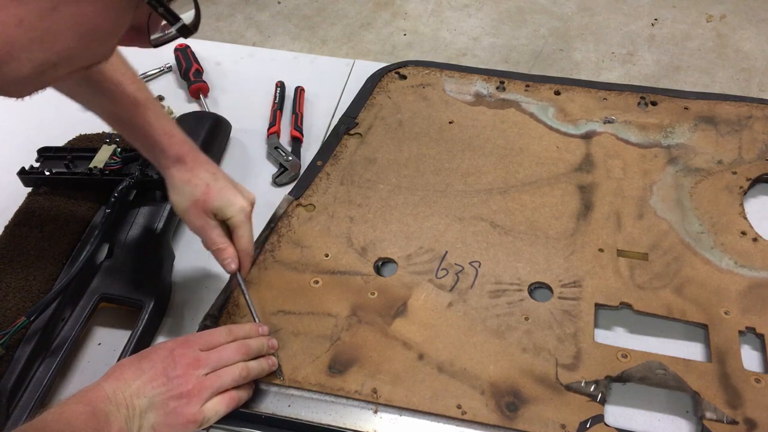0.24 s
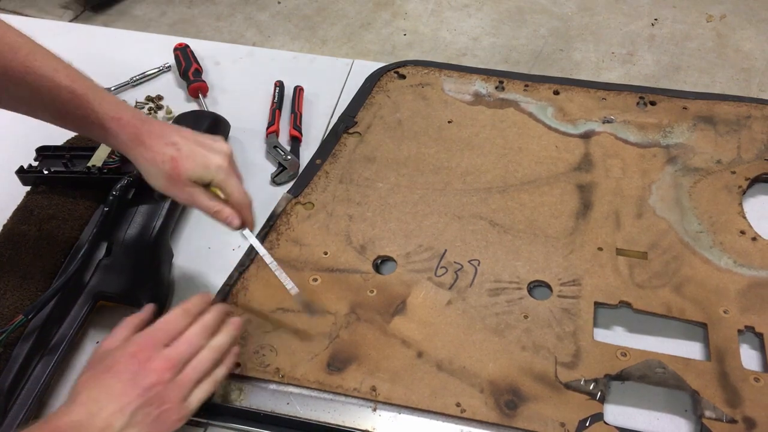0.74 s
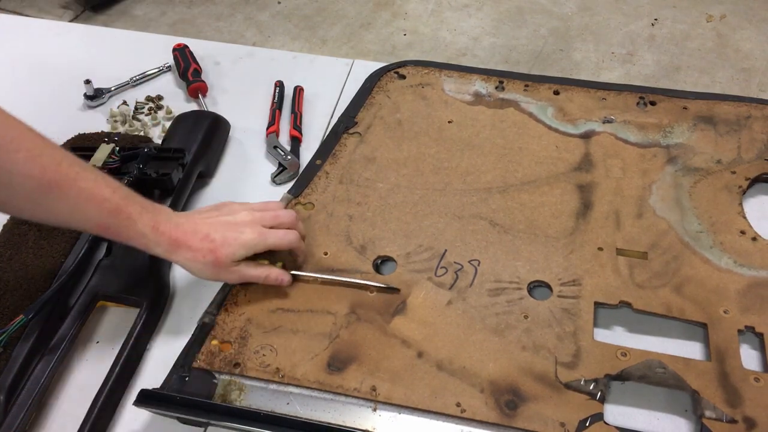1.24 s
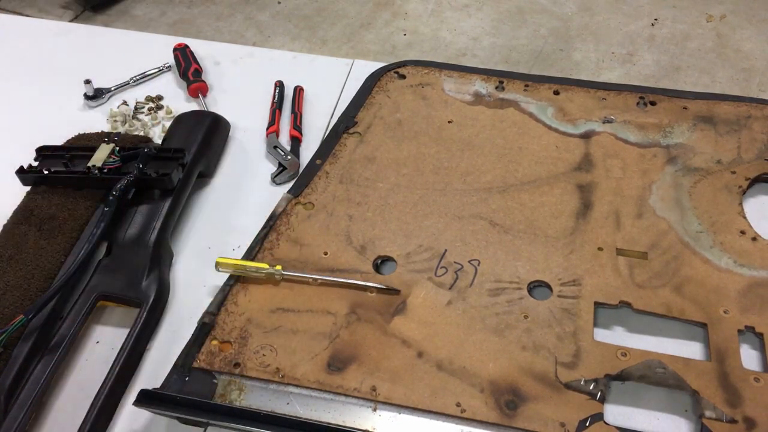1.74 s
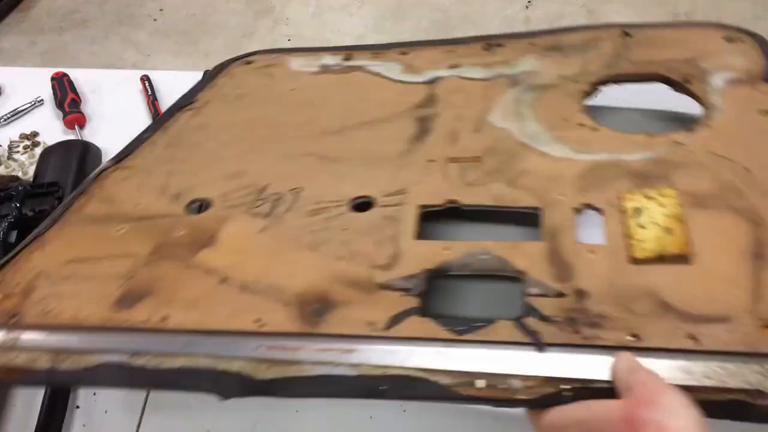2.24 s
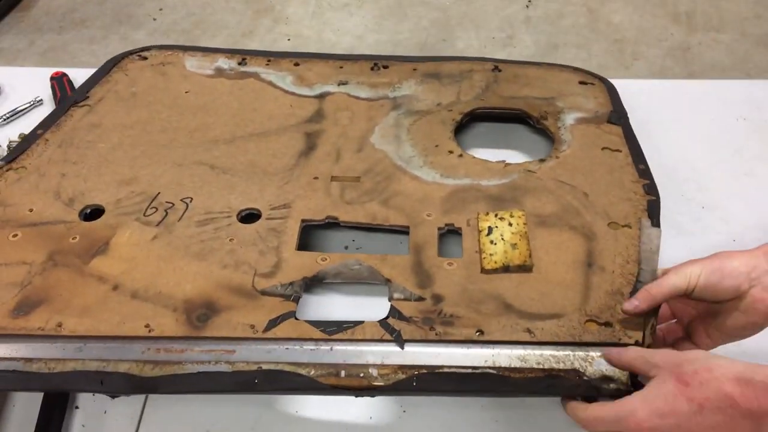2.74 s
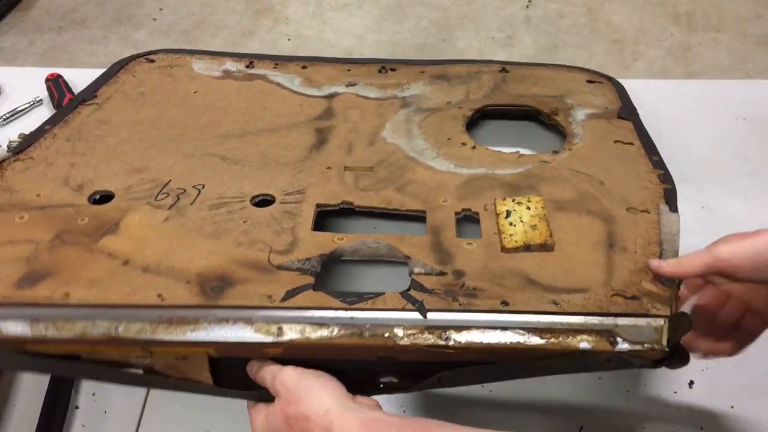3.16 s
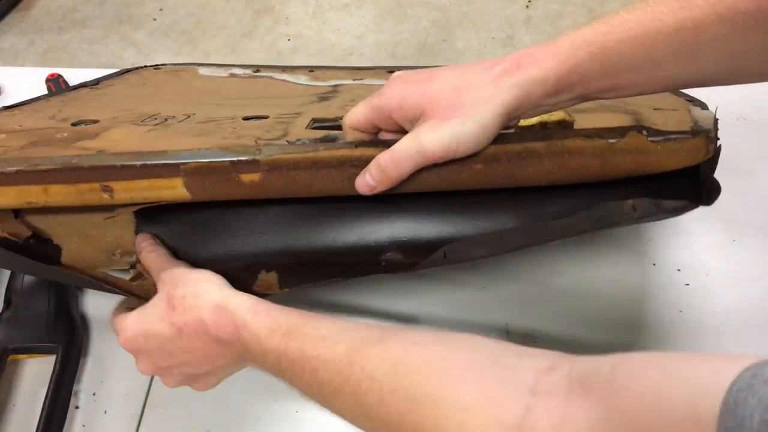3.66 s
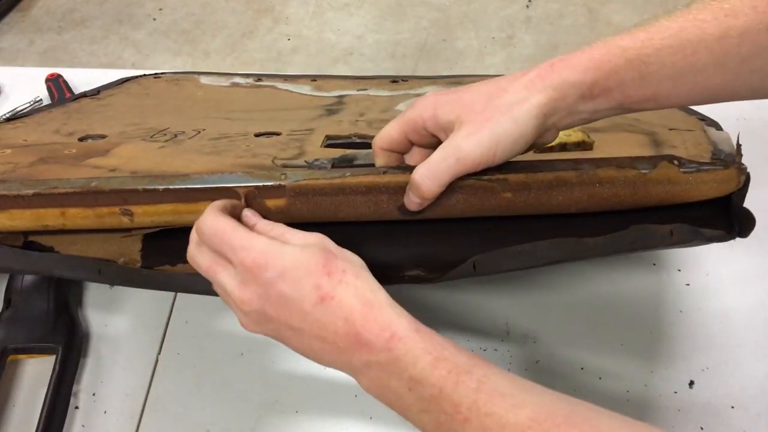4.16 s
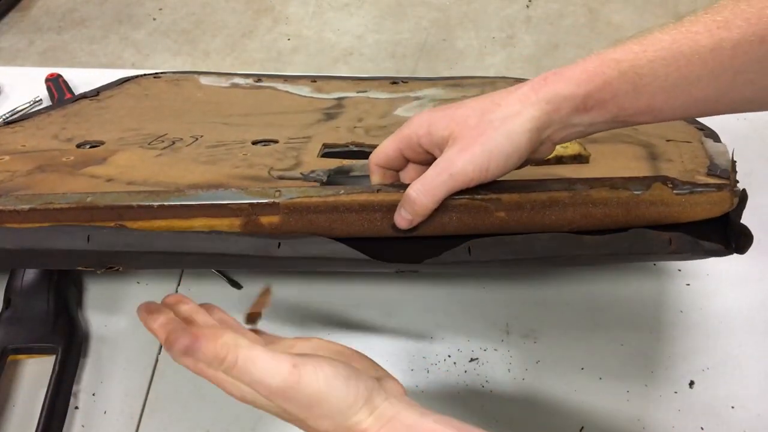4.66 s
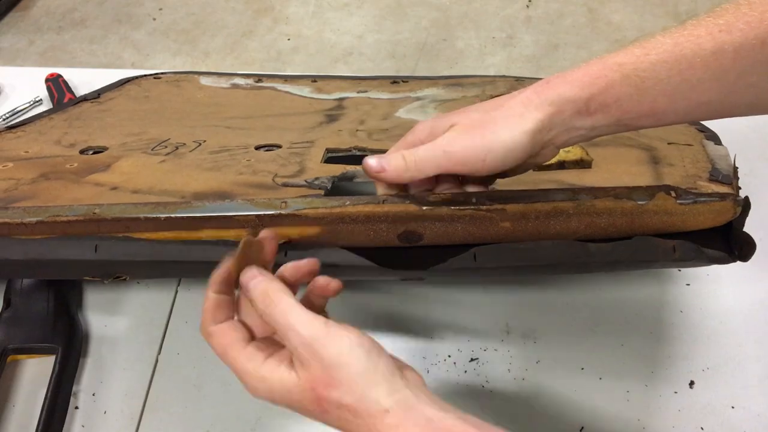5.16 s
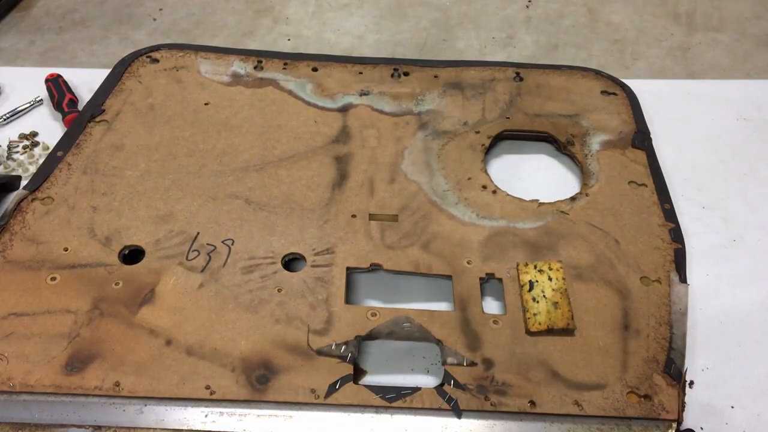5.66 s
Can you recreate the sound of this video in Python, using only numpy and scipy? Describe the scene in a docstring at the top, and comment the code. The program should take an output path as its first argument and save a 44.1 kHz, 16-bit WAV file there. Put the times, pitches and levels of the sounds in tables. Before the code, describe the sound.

A screwdriver levers and clacks against a resonant board, followed by scuffs, thuds, and short tearing pulls in a quietly rumbling workshop.

```python
"""Steel knocks ring a hardboard panel on a workshop bench: a screwdriver levers out a staple and is laid down.
Then the panel is turned and its glued covering peeled off in pulls, with crackle, rips, flaps and bumps.
Knocks are dispersed bending waves over decaying modes; bumps are short damped vibrations under scuffing noise.
Peeling and rubbing shape random fibre snaps by force curves; rips and crumbs are brief bursts of such snaps.
One near microphone, almost mono, hears it over a steady rumble and hiss."""
import sys
import numpy as np
from scipy import signal
from scipy.fft import rfft, irfft, next_fast_len
from scipy.io import wavfile
from scipy.ndimage import uniform_filter1d, map_coordinates

SR = 44100
rng = np.random.default_rng(int(sys.argv[2]) if len(sys.argv) > 2 else 0)


def to_wav(s):
    """Save 16-bit WAV."""
    ch = np.atleast_2d(s).T  # columns
    pcm = np.round(np.clip(ch, -1, 1) * 32767)  # PCM
    wavfile.write(sys.argv[1], SR, pcm.astype(np.int16))


N = 259749  # samples

# Event levels in dB are relative: each source adds its own offset.
# Steel meets the board. Each row: start in seconds, blow in dB, contact cut-off in Hz,
# steel click in dB, board ringing in dB.
KNOCKS = [(0.2562, -21, 1360, -29, -14), (0.3439, -7.5, 1760, -18, -8.5), (0.351, -3.5, 2200, -5.5, 4.5),
          (0.6929, -29, 1200, -33, -15.5), (0.871, -32, 2210, -53, -40), (1.057, 0, 1460, -36, -1.5),
          (1.162, -13, 2780, -27, -10.5), (1.2556, -1, 1480, -47, 4), (1.2958, -2.5, 1800, -53, -0.5),
          (1.598, -25.5, 1790, -34.5, -18.5), (1.685, -22.5, 1060, -34, -21),
          (1.903, -29.5, 2320, -60, -33)]
# Modes that ring after a knock, before a small random spread: the panel on the bench,
# and probably the screwdriver near 473 Hz. Each row: frequency in Hz, level in dB, t60 in seconds.
KNOCK_MODES = [(66, -10.5, 1), (96, -2, 0.26), (144.4, 1, 0.53), (178, -4.5, 0.46), (239.4, -16, 0.59),
               (285.4, -3.5, 0.32), (344, -16, 0.67), (473, -.5, 0.19), (600, -16, 0.14), (730, -5.5, 0.19),
               (910, -8, 0.09), (1182, -1.5, 0.11), (1810, -11, .09)]
# Spectrum of the first flexing wave. Each row: frequency in Hz, level in dB.
PUSH_SPECTRUM = [(40, -21), (130, -3), (450, 2.5), (950, -5), (1300, -7), (1900, -5.5), (3000, -8.5),
                 (16000, -6)]
# Returns from the panel's edges. Each row: delay in seconds, share of the amplitude.
EDGE_RETURNS = [(.00115, .25), (.0022, .3), (.0045, .25)]
# Spectrum of the steel click. Each row: frequency in Hz, level in dB.
STEEL_SPECTRUM = [(300, -13), (1200, 11.5), (2200, 8.5), (4000, -1), (5500, -6), (8000, 2.5), (10500, -8),
                  (15000, -5)]

# One pull on the covering. Each row: start in seconds, length in seconds, crackle in dB,
# fizz over crackle in dB, change of force by the end in dB.
PULLS = [(2.911, 0.13, -35.5, -4.5, -5), (3.023, 0.082, -34.5, -2, -6), (3.143, 0.091, -34, -8.5, -12),
         (3.314, 0.072, -39.5, -6, 0.5), (3.374, 0.056, -35.5, 0, -2.5), (3.438, 0.068, -42, -10, -1),
         (3.525, 0.12, -34.5, -2, -3), (3.727, 0.062, -42, -3.5, 0), (3.787, 0.067, -32.5, -4.5, -7),
         (3.894, 0.16, -35, -3, -7), (4.063, 0.248, -49.5, -2, -2), (4.785, 0.14, -50, -4, 0),
         (4.937, 0.17, -46, -0.5, -10.5), (5.151, 0.034, -54, 4, 10), (5.341, 0.094, -48, -6, 14.5)]
# A brief rip or crunch: the staple drags out, or a patch of glue gives. Each row: centre in seconds,
# level in dB, treble in dB, half length in seconds, resonance in Hz.
RIPS = [(0.351, -16.5, 2, 0.0011, 766), (0.621, -35, -2, 0.0029, 1090), (1.838, -43, 2, .003, 765),
        (2.137, -35.5, -15, 0.011, 3130), (2.318, -43.5, -3, 0.013, 3760), (2.578, -44.5, 2, 0.0036, 3540),
        (2.759, -43.5, 4.5, 0.0055, 2400), (2.891, -36.5, -5, 0.0065, 1900), (2.918, -36, 0, 0.0058, 4000),
        (3.166, -43, 11, 0.003, 1370), (3.21, -38.5, -8, 0.0032, 1470), (3.261, -34.5, 1, 0.0056, 3040),
        (3.36, -33.5, -5, 0.0093, 1270), (3.447, -32, -17, .004, 2500), (3.697, -28.5, -9.5, 0.013, 1370),
        (3.846, -29.5, -12, 0.011, 1160), (3.978, -31.5, -21, 0.0028, 4170),
        (4.179, -41, 4.5, 0.0092, 3420), (4.25, -41.5, 6.5, 0.01, 2500), (4.28, -36, 1, 0.0068, 3530),
        (4.917, -39.5, 5, 0.0039, 2970), (5.062, -44.5, -10, 0.0051, 1440), (5.441, -31, -0.5, .013, 1500)]
# Loose crumbs of glue are picked off. Each row: centre in seconds, level in dB.
CRUMBS = [(.075, -57), (4.408, -51.5), (4.44, -57), (4.485, -54.5), (4.552, -51.5), (4.585, -53),
          (4.603, -51.5)]
# Body of the snapping fibres. Each row: frequency in Hz, level in dB.
CRACKLE_SPECTRUM = [(260, -2.5), (450, -12), (768, -4), (823, -5.5), (955, -3), (1120, -0.5), (1300, -2.5),
                    (1950, -1), (2930, -6), (4300, -11.5), (4800, -20.5), (6240, -28), (10600, -120)]
# Treble of the snapping fibres. Each row: frequency in Hz, level in dB.
FIZZ_SPECTRUM = [(2590, -22.5), (4400, -5.5), (4930, -10), (5550, -2.5), (7760, -5.5), (9030, -3.5),
                 (10500, -9), (11300, -6), (15100, -11.5), (16000, -23)]
# How far the colour of the snaps wanders. Each row: frequency in Hz, rms deviation in dB.
GRAIN_PATCHES = [(2000, 3.5), (9000, 2)]

# The board bumps and flaps, or the bench booms low. Each row: peak time in seconds, level in dB,
# lowest mode in Hz, rise in seconds, overtone slope in dB per octave, scuff in dB.
BUMPS = [(.09, -39.5, 150, 0.0051, -8, -48), (0.388, -28, 64.8, 0.0041, 3, -52),
         (.705, -38, 147, .0033, -9, -52), (2.069, -37, 84, .0031, -25, -38),
         (2.179, -37, 393, 0.015, -2, -29.5), (2.244, -33, 101, 0.004, -6, -36),
         (2.324, -29, 104, 0.0023, -7, -32.5), (2.365, -29.5, 97, 0.004, -6, -41),
         (2.404, -18, 162, 0.003, 5.5, -20), (2.491, -33, 128, 0.0024, -4, -55),
         (2.675, -25.5, 80.3, .0075, 2.5, -26), (2.717, -29, 704, .002, -18, -36),
         (3.234, -31, 360, 0.0026, -4, -43), (3.3, -33, 504, 0.0052, 2, -20.5),
         (3.469, -34, 330, 0.0027, -15, -41), (3.664, -11, 1423, 0.0018, -29, -49),
         (3.666, -11, 268.5, 0.0026, -1, -11.5), (3.689, -20, 243, 0.0068, -17, -18.5),
         (3.847, -55, 536, 0.0017, 8, -24.5), (3.939, -24.5, 309, 0.0036, -24, -48),
         (5.289, -43.5, 134, 0.013, -1.5, -49.5), (5.447, -22.5, 386, 0.0085, -6.5, -19),
         (5.454, -16, 142.3, 0.0083, -2, -27.5), (5.63, -50, 164, .004, -5, -43),
         (5.706, -38, 88.4, .0056, 0.5, -50.5)]
# Modes of a damped vibration. Each row: ratio to the lowest mode, level in dB.
FLEX_MODES = [(1, 3.5), (2.12, -1), (3.1, -10), (5.1, -58), (7.3, -21.5)]
# Spectrum of the scuff under a bump. Each row: frequency in Hz, level in dB.
SCUFF_SPECTRUM = [(40, -22), (120, 5), (500, -1.5), (900, -2.5), (1400, -7.5), (2000, -9.5), (3000, -18),
                  (5000, -26.5), (16000, -47)]

# Hands, tool and panel slide over each other. Each row: start in seconds, length in seconds,
# level in dB, change of pressure by the end in dB.
RUBS = [(0.522, 0.12, -52, 3.5), (1.161, 0.089, -51, 4.5), (1.707, 0.17, -46, -7),
        (1.929, 0.014, -42.5, 1.5), (2.094, 0.12, -37.5, -3.5), (2.231, 0.035, -40.5, -2.5),
        (2.428, 0.23, -49, -4.5), (2.671, .03, -41, -6), (2.73, 0.187, -48.5, 3.5),
        (5.476, .085, -50.5, 0.5), (5.618, 0.051, -51.5, -2), (5.751, 0.092, -44, -16.5)]
# Spectrum of the shaking board. Each row: frequency in Hz, level in dB.
RUSTLE_SPECTRUM = [(26, -32), (45, -2.5), (87, 2), (189, -3.5), (313, 2.5), (372, -2), (432, -8), (519, -6),
                   (596, -6), (700, -7.5), (910, -35), (1540, -120)]

# Reverberation of the workshop. Each row: frequency in Hz, t60 in seconds.
ROOM_DECAY = [(60, 1), (200, 0.59), (1000, 0.49), (3000, 0.38), (8000, 0.33), (16000, 0.29)]
# Spectrum of the background. Each row: frequency in Hz, level in dB.
AIR_SPECTRUM = [(12, -58), (20, -14), (68, -2.5), (101, 3), (123, -5.5), (187, -8.5), (270, -9), (310, -11),
                (873, -17.5), (2080, -20), (3250, -23.5), (4420, -20), (4940, -24.5), (9140, -27.5),
                (16000, -31)]
# Right channel over left. Each row: frequency in Hz, difference in dB.
TILT = [(100, 0.36), (500, 0.37), (2000, 0.05), (12000, 0.03)]

# a bump rings this long at this pitch; higher ones die sooner
DAMPED_T60_S, DAMPED_HZ, DAMPED_SLOPE = 0.084, 160, 0.87
# the force of a pull rises and falls fast; it also shakes the board (rustle relative to crackle)
PULL_ATTACK_S, PULL_RELEASE_S, PULL_RUSTLE_DB = 0.013, 0.015, -4.5
# a rub is softer and duller than a pull (fizz and rustle relative to crackle)
RUB_ATTACK_S, RUB_RELEASE_S, RUB_FIZZ_DB, RUB_RUSTLE_DB = 0.017, 0.025, -7.5, 1.5
CRUMB_S, CRUMB_CRACKLE_DB = 0.0051, -9  # half length; body relative to the fizz
TOP_HZ = 15950  # band limit


def amp(db):
    """A level in decibels is twenty times the logarithm of an amplitude ratio."""
    return 10 ** (np.asarray(db) / 20)


def unit(x):
    """Normalisation: the mean square measures power, so dividing by its root gives rms 1."""
    return x / np.sqrt(np.mean(x ** 2) + 1e-20)


def along(points, hz):
    """Interpolation on a logarithmic frequency axis, from rows of (Hz, value)."""
    point_hz, values = np.transpose(points)
    return np.interp(np.log(hz + 1), np.log(point_hz + 1), values)


def filtered(x, response):
    """Linear filtering: the spectrum is multiplied by a response of frequency."""
    n = x.shape[-1]
    padded = next_fast_len(n + SR // 8)
    spectrum = rfft(x, padded) * response(np.fft.rfftfreq(padded, 1 / SR))
    return irfft(spectrum, padded)[..., :n]


def coloured(x, spectrum):
    """Spectral shaping: a signal is weighted by a level curve and brought to rms 1."""
    return unit(filtered(x, lambda hz: amp(along(spectrum, hz))))


def wobble(rate):
    """Random modulation: straight lines join normally distributed knots, rate of them a second."""
    knots = rng.standard_normal(int(N * rate / SR) + 4)
    return map_coordinates(knots, [np.arange(N) * rate / SR], order=1)


def add(track, s, sound):
    """Superposition: a sound is summed into the track from s seconds on."""
    i = max(round(s * SR), 0)
    track[i:i + len(sound)] += sound[:max(N - i, 0)]


def flex_wave(spectrum, contact_hz, spread_s, size):
    """Dispersion: a blow spreads as a bending wave whose highs arrive first."""
    hz = np.fft.rfftfreq(size, 1 / SR)
    gain = amp(along(spectrum, hz)) / np.sqrt(1 + (hz / contact_hz) ** 6)
    delay = spread_s / np.sqrt(hz / 1000 + .1)
    # phase is the running sum of group delay over frequency
    phase = -2 * np.pi * np.cumsum(delay) * SR / size
    return irfft(gain * np.exp(1j * phase), size)


def screwdriver(push_db=22, ring_db=-27, click_db=9, wet_db=-9, click_wet_db=-3, take_up_s=0.0087):
    """Impact excitation: each contact clicks, flexes the board and leaves modes ringing."""
    out, t = np.zeros(N), np.arange(SR) / SR
    for s, db, contact_hz, steel_db, board_db in KNOCKS:
        push = amp(db + push_db) * flex_wave(PUSH_SPECTRUM, contact_hz, spread_s=0.00153, size=SR)
        # the wave comes back from the panel's edges and colours the knock
        push = push + sum(share * np.roll(push, round(lag * SR)) for lag, share in EDGE_RETURNS)

        ring = np.zeros(SR)
        for hz, level, t60 in KNOCK_MODES:
            decay = amp(level + rng.normal(0, 0.19) - 60 * t / t60)
            detuned_hz = hz * (1 + rng.normal(0, 0.0262))
            ring += decay * np.sin(2 * np.pi * detuned_hz * t)
        # the bench takes up the blow over a few milliseconds
        ring *= amp(board_db + ring_db) * (1 - np.exp(-t / take_up_s))

        click = amp(steel_db + click_db) * flex_wave(STEEL_SPECTRUM, SR, spread_s=0.0029, size=SR)
        wet = amp(wet_db) * room(push) + amp(click_wet_db) * room(click)
        add(out, s, push + ring + click + wet)
    return out


def fibres(rate=3000, scatter_db=4, hiss=0.81):
    """Random fracture: tiny bonds break at random moments and uneven sizes, in shifting colour."""
    breaks = (rng.random(N) < rate / SR) * amp(scatter_db * rng.standard_normal(N))
    snaps = unit(breaks * rng.choice([-1, 1], N))
    hz, _, z = signal.stft(snaps + hiss * rng.standard_normal(N), SR, nperseg=256)
    # noise smoothed over frequency, then time, makes slowly moving patches
    field = uniform_filter1d(rng.standard_normal(z.shape), size=4, axis=0)
    field = uniform_filter1d(field, size=7, axis=1)
    patchy_db = along(GRAIN_PATCHES, hz)[:, None] * unit(field)
    return signal.istft(z * amp(patchy_db), nperseg=256)[1][:N]


def stroke(start, length, change_db, attack_s, release_s):
    """Force envelope of one movement: it rises, grows or sags while held, and lets go."""
    t = np.arange(N) / SR - start
    rise = np.clip(t / attack_s + .5, 0, 1)
    release = np.exp(-np.maximum(t - length, 0) / release_s)
    return rise * release * amp(change_db * np.clip(t / length, 0, 1))


def friction(crackle, fizz, rustle, catch_db):
    """Uneven sliding: three force curves drive snapping fibres and the shaking board in catches."""
    catches = amp(catch_db * wobble(rate=130))
    grains = fibres()
    snapping = crackle * coloured(grains, CRACKLE_SPECTRUM) + fizz * coloured(grains, FIZZ_SPECTRUM)
    shaking = rustle * coloured(rng.standard_normal(N), RUSTLE_SPECTRUM)
    return catches * (snapping + shaking)


def peeling(level_db=-1):
    """Progressive fracture: the covering comes away pull by pull, each force curve driving fibre snaps."""
    forces, fizzes = [], []
    for s, length, db, fizz_db, change_db in PULLS:
        force = amp(db + level_db) * stroke(s, length, change_db, PULL_ATTACK_S, PULL_RELEASE_S)
        forces.append(force)
        fizzes.append(force * amp(fizz_db))
    strongest = np.max(forces, axis=0)  # overlapping pulls do not add
    return friction(strongest, np.max(fizzes, axis=0), amp(PULL_RUSTLE_DB) * strongest, catch_db=2.5)


def rips(level_db=-3, fizz_db=-3, resonance_db=-1, sharpness=5):
    """Resonant noise burst: a brief rip or crunch as the staple drags out, or a patch of glue gives."""
    out, t = np.zeros(N), np.arange(-SR // 16, SR // 16) / SR
    grains = fibres()
    for s, db, treble_db, half, ring_hz in RIPS:
        snaps = grains[round(s * SR):][:len(t)]
        # a single resonance, its Q given by sharpness
        resonance = lambda hz: 1 / (1 + 1j * sharpness * (hz / ring_hz - ring_hz / (hz + 1)))
        ringing = unit(filtered(snaps, resonance))
        body = coloured(snaps, CRACKLE_SPECTRUM)
        fizz = coloured(snaps, FIZZ_SPECTRUM)
        sound = body + amp(resonance_db) * ringing + amp(treble_db + fizz_db) * fizz
        swell = np.exp(-.5 * (t / half) ** 2)
        body_rms = np.sqrt(np.average(body ** 2, weights=swell ** 2))
        add(out, s + t[0], amp(db + level_db) * swell * sound / body_rms)
    return out


def bumps(scuff_share=0.95, flex_db=-1, damping=0.26):
    """Damped vibration: the board bumps and flaps, or the bench booms low, briefly and under a scuff."""
    out, t = np.zeros(N), np.arange(-SR // 16, SR // 2) / SR
    for s, db, hz, rise, tilt_db, scuff_db in BUMPS:
        t60 = DAMPED_T60_S * (DAMPED_HZ / hz) ** DAMPED_SLOPE
        attack = np.exp(np.minimum(t, 0) / rise)
        swell = lambda life: attack * amp(-60 * np.maximum(t, 0) / life)
        flex = np.zeros(len(t))
        for ratio, level in FLEX_MODES:
            gain = amp(level + tilt_db * np.log2(ratio))
            tone = np.sin(2 * np.pi * (hz * ratio * t + rng.random()))
            flex += gain * swell(t60 / ratio ** damping) * tone
        scuff = swell(scuff_share * t60) * coloured(rng.standard_normal(len(t)), SCUFF_SPECTRUM)
        add(out, s + t[0], amp(db + flex_db) * flex + amp(scuff_db) * scuff)
    return out


def rubbing(level_db=-1):
    """Sliding friction: the panel is shifted and turned on the bench under changing pressure."""
    forces = [amp(db + level_db) * stroke(s, length, change_db, RUB_ATTACK_S, RUB_RELEASE_S)
              for s, length, db, change_db in RUBS]
    force = np.max(forces, axis=0)
    return friction(force, amp(RUB_FIZZ_DB) * force, amp(RUB_RUSTLE_DB) * force, catch_db=2.0)


def crumbs():
    """Brittle fracture: dry specks break with a thin tick, a short bell-shaped burst of snaps."""
    t, grains = np.arange(N) / SR, fibres()
    force = sum(amp(db) * np.exp(-.5 * ((t - s) / CRUMB_S) ** 2) for s, db in CRUMBS)
    body = amp(CRUMB_CRACKLE_DB) * coloured(grains, CRACKLE_SPECTRUM)
    return force * (coloured(grains, FIZZ_SPECTRUM) + body)


def room(x):
    """Reverberation: the workshop answers with a noise tail in which each frequency dies at its own speed."""
    hz, t, z = signal.stft(rng.standard_normal(SR * 2 // 3), SR, nperseg=256)
    decay = amp(-60 * t / along(ROOM_DECAY, hz)[:, None])
    tail = signal.istft(z * decay, SR, nperseg=256)[1]
    tail *= 1 - np.exp(-np.arange(len(tail)) / SR / 0.0024)  # build-up time constant in seconds
    return signal.fftconvolve(x, tail / np.linalg.norm(tail))[:len(x)]


def workshop_air(level_db=-53):
    """Stationary noise: the rumble and hiss of the room, drifting slightly in level."""
    drift_db = .6 * wobble(3)
    return amp(level_db + drift_db) * coloured(rng.standard_normal(N), AIR_SPECTRUM)


def scene():
    """Superposition of close, nearly centred sources; all but the knocks hardly stir the room."""
    handling = bumps() + peeling() + rubbing() + rips() + crumbs()
    mono = screwdriver() + handling + amp(-25.0) * room(handling) + workshop_air()
    # half the tilt is taken from the left and half given to the right
    return filtered(mono, lambda hz: amp(along(TILT, hz) * np.array([[-.5], [.5]])))


def record(dry):
    """Gain and band limiting: the level dips briefly once; nothing is kept from TOP_HZ upwards."""
    dip_db = np.interp(np.arange(N) / SR, [1.911, 1.916, 1.926, 1.936], [0, -22, -22, 0])
    return filtered(dry * amp(dip_db), lambda hz: hz < TOP_HZ)


dry = scene()
out = record(dry)
to_wav(out)
```